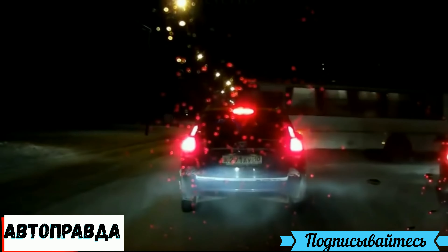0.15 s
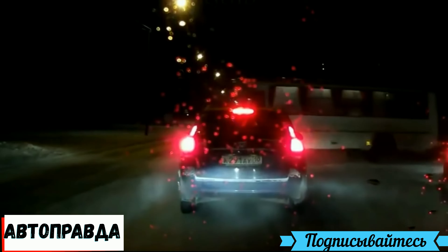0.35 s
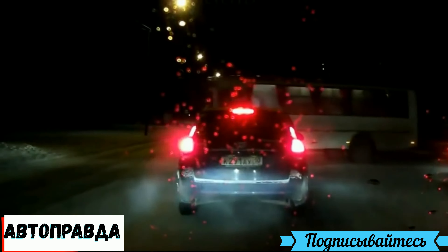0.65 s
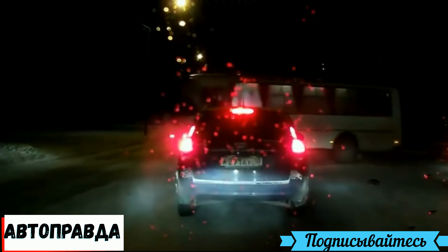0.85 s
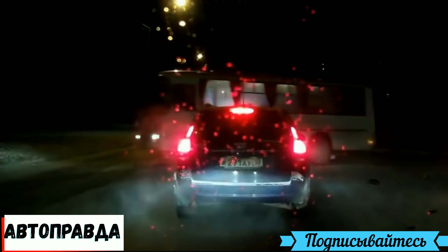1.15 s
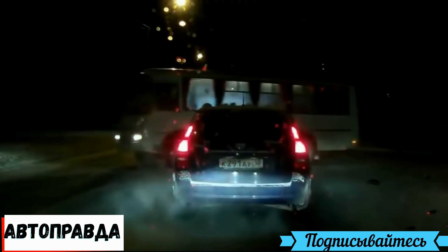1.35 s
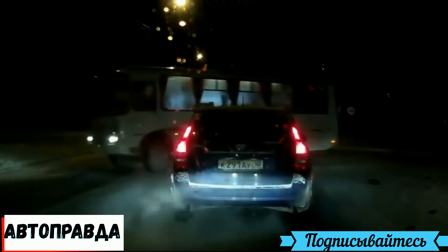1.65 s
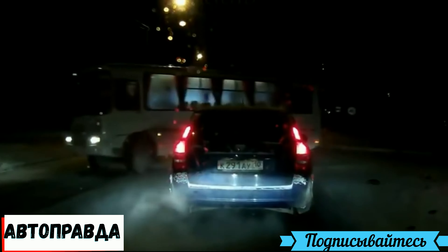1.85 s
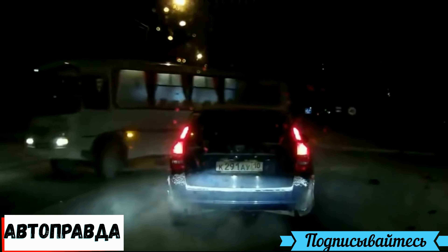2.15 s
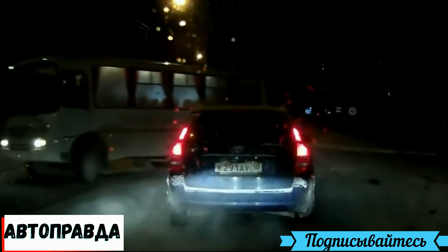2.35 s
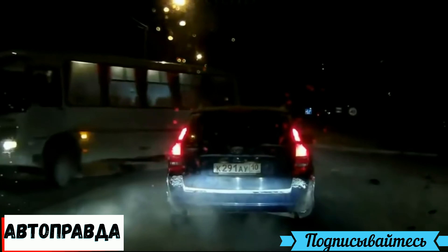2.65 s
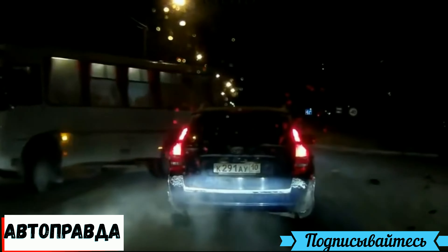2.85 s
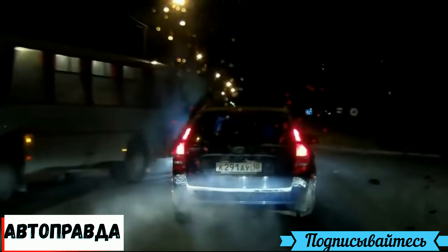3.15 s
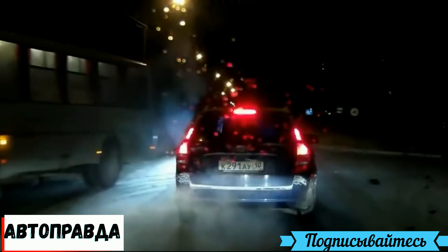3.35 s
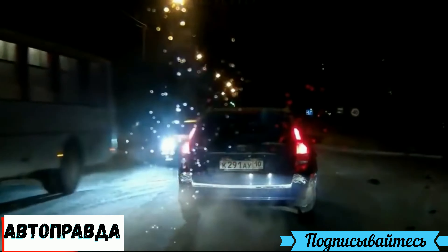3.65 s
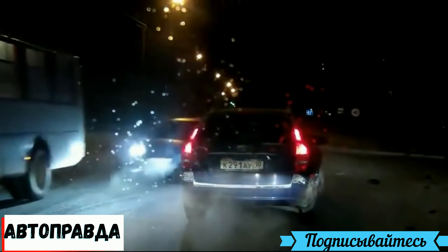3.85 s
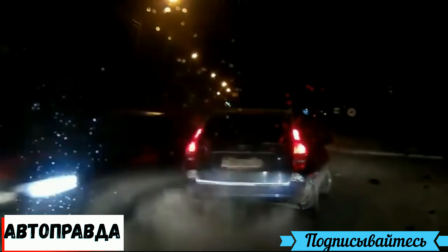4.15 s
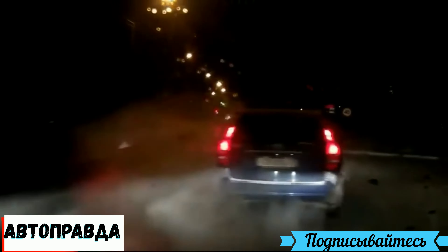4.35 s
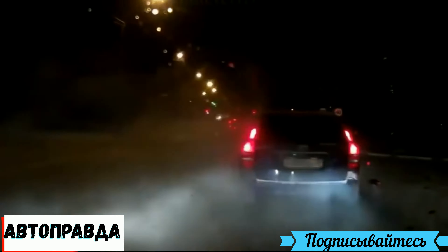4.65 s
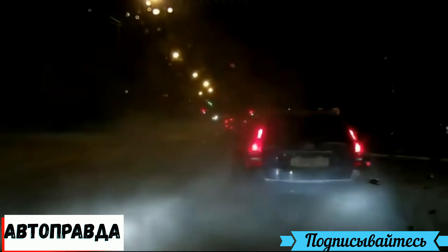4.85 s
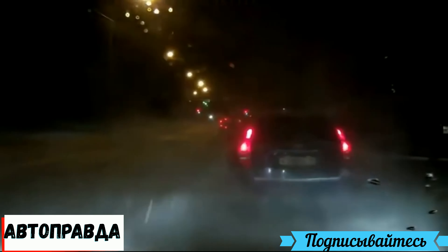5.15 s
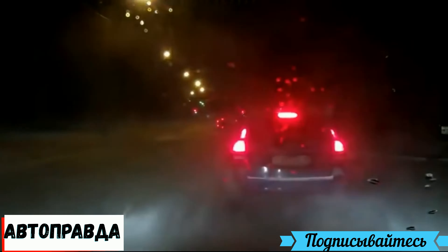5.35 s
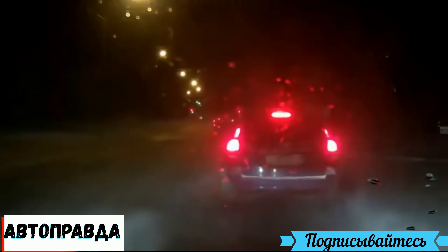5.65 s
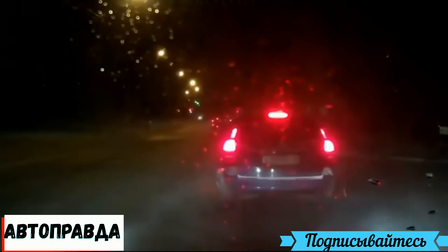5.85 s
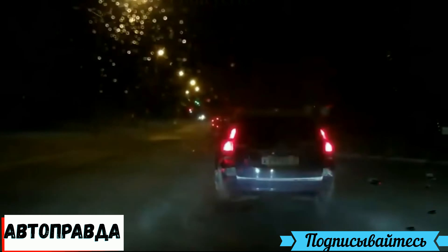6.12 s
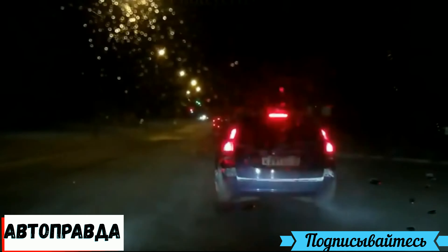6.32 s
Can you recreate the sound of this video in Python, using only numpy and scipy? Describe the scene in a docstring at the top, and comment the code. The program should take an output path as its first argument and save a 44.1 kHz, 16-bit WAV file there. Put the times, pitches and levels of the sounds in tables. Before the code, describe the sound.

A small, narrow-sounding dashboard microphone with faint electronic hiss sits in a closed car cabin on a snowy road. From 0 s, tyres rumble low and steadily over a quiet idling engine. From about 1.7 s a bus drones low, dipping in pitch near 2.6 s, then pulling harder and rising until about 3.6 s before dropping again. Slush sprays around 3.3 s, more strongly at 3.6 s with a hollow wheel-arch drumming, and again near 4 s. At 4.27 s a first crunching blow lands; from 4.5 to 4.7 s a heavier one booms through the body, distorting, with plastic and metal crackle and short rasping squeaks. It shudders away by about 5 s. The engine flares around 4.9 s, then sinks while growing louder. Debris clinks sparsely, densest from 5.35 to 5.6 s, with a few last ticks near 6-6.5 s over wet tyre hiss and low jolts.

```python
"""Car collision on a snowy road

A small microphone on the dashboard of a rolling car, on a snowy road at night: tyres rumble (shaped noise), the
engine turns slowly (two harmonics), a bus revs past across the lane, slush sprays (grains and mist).
A collision comes in two crunching blows (grains and noise through resonances), the second booming through the
body and overloading the microphone. Bits of plastic and glass then clink down while the car rolls on."""
import sys
import numpy as np
from scipy import signal
from scipy.fft import rfft, irfft, next_fast_len
from scipy.io import wavfile
from scipy.ndimage import uniform_filter1d

SR = 44100
rng = np.random.default_rng(int(sys.argv[2]) if len(sys.argv) > 2 else 0)


def unload_wav(signal):
    """Save mono or channel-first audio to the path in sys.argv[1] as 16-bit WAV at rate SR, clipped to [-1, 1]."""
    wavfile.write(
        sys.argv[1],
        SR,
        np.round(np.clip(np.atleast_2d(signal).T, -1, 1) * 32767).astype(np.int16),
    )


N = 286089
T = np.arange(N) / SR  # t/s


# Blows: height t/s, rise/s, fall/s, body shake level/dB, crunch level/dB, boom f/Hz, boom peak level/dB
BLOWS = [(4.266, 0.031, 0.067, -16, -24.5, 113.8, -10), (4.295, 0.022, 0.029, -11.5, -27.5, 425, -14.5),
         (4.364, 0.045, .022, -32, -58, 133.5, -14.5), (4.514, 0.01, 0.012, -18.5, -38, 140, -8),
         (4.564, 0.027, 0.074, -11, -31, 130.6, -11), (4.6, 0.016, 0.028, -9, -45, 244, -7),
         (4.659, .033, 0.035, -5.5, -26.5, 117, -9), (4.737, 0.018, 0.016, -29, -44, 133, -10.5)]
# Colour of the shaking body: f/Hz, level per Hz/dB
SHAKE_COLOUR = [(20, -7), (55, 1), (82, -7), (125, 2), (175, -6), (250, -8), (340, -7.5), (420, -11.5),
                (560, -13), (700, -18), (1000, -26), (1600, -34.5), (3000, -33.5)]
# Resonances of the shaken body: f/Hz, width/Hz, level/dB
BODY_MODES = [(176.3, 10.8, 6.5), (202, 15.5, 2), (251.7, 14.6, 5.5), (332.5, 21, -0.5), (408, 13, -6.5),
              (482, 20, -9), (690, 8.4, -6.5), (889, 16, -9), (1394, 22, -19.5)]
# Colour of crunching plastic and sheet metal: f/Hz, level per Hz/dB
CRUNCH_COLOUR = [(600, -8), (1200, -1.5), (1800, -4), (2200, 3), (2600, 0.5), (3000, -1.5), (3500, -6),
                 (4200, -5), (4900, -22), (7000, -35)]
# Resonances of the crumpling panels: f/Hz, width/Hz, level/dB
PANEL_MODES = [(1914, 24, 0), (2170, 46, -5.5), (2496, 100, -1), (2870, 50, 0), (2950, 40, 1),
               (3230, 44, 4.5), (3590, 70, 0.5), (3900, 160, -14)]
# What lingers after each blow, in dB below it
SHUDDER_DB, SHUDDER_DECAY_S = -12, 0.14
GRIND_DB, GRIND_DECAY_S = -14, 0.21


def collision():
    """Each blow buckles a panel: it booms, shakes the body and crunches, then shudders and grinds away."""
    shaking, crunching, booms = [], [], 0
    for at, rise, fall, shake_db, crunch_db, boom_hz, boom_db in BLOWS:
        force = swell(at, rise, fall)
        shudder = undb(SHUDDER_DB) * aftermath(at, SHUDDER_DECAY_S)
        grind = undb(GRIND_DB) * aftermath(at, GRIND_DECAY_S)
        shaking.append(undb(shake_db) * np.maximum(force, shudder))
        crunching.append(undb(crunch_db) * np.maximum(force, grind))
        booms = booms + undb(boom_db) * force * np.cos(2 * np.pi * boom_hz * (T - at))

    rattle = colour(grains(rate=2500, spread_db=2.0), SHAKE_COLOUR)
    body = unit(resonate(grains(rate=3100, spread_db=1.0), BODY_MODES))
    shake = unit(rattle + undb(-4) * body)

    crackle = colour(grains(rate=3300, spread_db=6), CRUNCH_COLOUR)
    panels = unit(resonate(colour(noise(), CRUNCH_COLOUR), PANEL_MODES))
    crunch = unit(crackle + undb(2) * panels) * undb(1.7 * walk(90))
    return shake * together(shaking) + crunch * together(crunching) + booms


# Heaves at the big blows, jolts as the car rolls on: height t/s, f/Hz, peak level/dB
JOLTS = [(4.331, 55, -17), (4.655, 55.4, 1), (4.931, 50.5, -21.5), (5.05, 48, -19), (5.26, 46.9, -19),
         (5.718, 42.4, -22)]
JOLT_RISE_S, JOLT_FALL_S = 0.027, 0.047
# Deep rumble of the whole shell around the collision
WALLOW_HZ, WALLOW_WIDTH_HZ, WALLOW_DB = 36.7, 11, -23.5
WALLOW_S, WALLOW_RISE_S, WALLOW_FALL_S = 4.39, 0.47, .9


def jolts():
    """The whole shell swings on its springs in short low tones and rumbles in a narrow band."""
    swings = 0
    for at, hz, db in JOLTS:
        envelope = undb(db) * swell(at, JOLT_RISE_S, JOLT_FALL_S)
        swings = swings + envelope * np.cos(2 * np.pi * hz * (T - at))
    wallow = undb(WALLOW_DB) * band(WALLOW_HZ, WALLOW_WIDTH_HZ)
    return swings + wallow * swell(WALLOW_S, WALLOW_RISE_S, WALLOW_FALL_S)


# Squeaks of sliding panels: height t/s, level/dB before the rasp
SQUEAKS = [(4.43, -31), (4.52, -24), (4.548, -24.5), (4.62, -24.5), (4.678, -26.5), (4.745, -32)]
SQUEAK_RISE_S, SQUEAK_FALL_S = 0.0109, .014
SQUEAK_HZ, SQUEAK_BEND_HZ = 2490, 129.8  # pitch when barely pressed, and its rise at the greatest pressure


def squeaks():
    """A sliding panel squeals higher the harder it is pressed; stick and slip make it rasp and break up."""
    pressure = sum(undb(db) * swell(at, SQUEAK_RISE_S, SQUEAK_FALL_S) for at, db in SQUEAKS)
    rasp = 1 + .03 * walk(1200) + .024 * walk(140)
    hz = (SQUEAK_HZ + SQUEAK_BEND_HZ * pressure / pressure.max()) * rasp
    breaking_up = undb(2.5 * walk(300))
    return pressure * breaking_up * np.sin(2 * np.pi * np.cumsum(hz) / SR)


# Falling bits: t/s, clink level/dB, ring f/Hz, chatter decay/s, dull knock level re clink/dB
CLINKS = [(4.971, -49.5, 3060, 0.023, 13), (5.156, -25, 4400, 0.0038, -37), (5.305, -47, 5160, 0.012, -25),
          (5.3492, -14.5, 2880, 0.0032, -5.5), (5.352, -17, 2090, 0.0038, -9.5),
          (5.357, -21, 3770, 0.0025, -0.5), (5.464, -33.5, 3420, 0.0038, -10),
          (5.479, -15.5, 3560, 0.003, -20), (5.485, -31, 2690, 0.0042, -13),
          (5.4997, -34, 4000, .0031, -18), (5.549, -21.5, 3330, 0.0032, -17),
          (5.567, -25, 3100, 0.0044, -19), (5.574, -28, 2420, 0.0092, -12), (5.614, -38, 3800, 0.014, -11),
          (5.680, -41.5, 2840, 0.031, -10), (5.985, -37.5, 3375, .0044, -17),
          (6.0218, -27, 5040, 0.012, -6.5), (6.082, -32.5, 4100, 0.0059, -21),
          (6.093, -27, 2750, 0.0055, -11), (6.203, -48, 1070, 0.033, 8.5), (6.480, -31.5, 3840, .008, -8)]
# Resonances all the bits share: f/Hz, width/Hz, level/dB
SHARD_MODES = [(1470, 160, -8), (1830, 100, -2), (2285, 140, 2), (2720, 180, 1), (3040, 140, 0.5),
               (3600, 340, 0.5), (4160, 176, 3), (4870, 910, -5), (6200, 1200, -20)]
TOUCH_DB = 13.5  # first sharp touch, above the chatter


def debris():
    """Each bit strikes, chatters for a few milliseconds or more and rings."""
    t = T[:SR // 5]
    out = np.zeros(N + len(t))
    for at, db, hz, decay, knock_db in CLINKS:
        chatter, thud, tail = rng.standard_normal((3, len(t)))
        contact = chatter * np.exp(-t / decay) + undb(-19) * tail * np.exp(-t / 0.018)
        contact[0] += undb(TOUCH_DB)
        # all bits ring alike, and each adds a short note of its own
        shards = resonate(contact, SHARD_MODES) + undb(-15.0) * contact
        clink = unit(ring(shards, hz, 0.59 * hz))
        note = unit(np.sin(2 * np.pi * hz * t) * np.exp(-t / (0.68 * decay)))
        knock = unit(ring(ring(thud * np.exp(-t / decay), 840, 1300), 860, 1170))
        bit = clink + undb(-6.5) * note + undb(knock_db) * knock
        # the level counts over the decay, not over the whole window
        gain = undb(db) * np.sqrt(decay / t[-1])
        start = int(at * SR)
        out[start:start + len(t)] += gain * bit
    return out[:N]


CRUMB_DB, CRUMB_DECAY_S = -32, 0.035  # re the level of the bit that sheds them
SHOWER_S, SHOWER_DB, SHOWER_RISE_S, SHOWER_FALL_S = 5.61, -47.5, 0.29, .9


def crumbs():
    """Crumbs skitter as tiny ringing impacts after each falling bit and in a thin shower between them."""
    shed = [undb(db + CRUMB_DB) * aftermath(at, CRUMB_DECAY_S) for at, db, *_ in CLINKS]
    shower = undb(SHOWER_DB) * swell(SHOWER_S, SHOWER_RISE_S, SHOWER_FALL_S)
    skitter = unit(resonate(grains(rate=600, spread_db=-0.5), SHARD_MODES))
    return skitter * together(shed + [shower])


# Slush thrown by tyres, and at 4.48 s snow thrown up by the collision: t/s, hold/s, drops level/dB, rise/s,
# fall/s, fine mist level/dB, arch drumming level/dB
SPLASHES = [(3.335, 0.038, -47.5, 0.085, .05, -56.5, -71), (3.595, .11, -36, 0.036, .012, -46, -29),
            (3.915, 0.022, -38.5, 0.045, .036, -53, -58), (4.015, 0.039, -35, 0.044, 0.058, -49.5, -48),
            (4.48, 0.28, -39.5, 0.14, 0.12, -60.5, -66), (4.975, .03, -45, 0.038, 0.03, -68, -60)]
# Colour of the spray: f/Hz, level per Hz/dB
SPRAY_COLOUR = [(300, -23), (700, 2), (1000, 0), (1400, 0.5), (1900, -5.5), (2800, -0.5), (4400, -1.5),
                (5500, -11), (6800, -18.5), (7800, -9)]
MIST_HZ, MIST_WIDTH_HZ = 6100, 2000
# Tyre hiss on the wet road
WET_DB, WET_S, WET_RISE_S, WET_HOLD_S, WET_FALL_S = -53.5, 3.83, 0.78, 2.15, 0.83


def spray():
    """Wet snow sprays in bursts of drops (grains) and mist (high noise) over the hiss of the tyres."""
    drop_levels = [undb(WET_DB) * swell(WET_S, WET_RISE_S, WET_FALL_S, WET_HOLD_S)]
    mist_level = 0
    for at, hold, db, rise, fall, mist_db, _ in SPLASHES:
        burst = swell(at, rise, fall, hold)
        drop_levels.append(undb(db) * burst)
        mist_level = mist_level + undb(mist_db) * burst
    drops = colour(grains(rate=6000, spread_db=0), SPRAY_COLOUR) * together(drop_levels)
    mist = band(MIST_HZ, MIST_WIDTH_HZ) * mist_level
    return (drops + mist) * undb(1.2 * walk(110))


# Resonances of the wheel arch: f/Hz, width/Hz, level/dB
ARCH_MODES = [(174.6, 37, 3), (192, 7.9, -10), (594, 62, -5.5), (825, 110, -7.5), (1410, 28, -11),
              (3200, 71, -17)]
ARCH_HZ, ARCH_NOTE_DB, ARCH_RING_S = 178.6, 2, .045  # lowest note: pitch, peak re drumming, fall after a splash


def wheel_arch():
    """The thickest slush drums in a wheel arch and sets its lowest note humming; the note rings on."""
    drumming = unit(sum(undb(db) * band(hz, width) for hz, width, db in ARCH_MODES))
    hz = ARCH_HZ * (1 + 0.021 * walk(25))
    note = undb(ARCH_NOTE_DB) * np.sin(2 * np.pi * np.cumsum(hz) / SR)
    out = 0
    for at, hold, _, rise, fall, _, db in SPLASHES:
        struck = drumming * swell(at, rise, fall, hold)
        humming = note * swell(at, rise, ARCH_RING_S, hold)
        out = out + undb(db) * (struck + humming)
    return out


# Bus engine: t/s, firing f/Hz
BUS_FIRING = [(1.7, 64.4), (2.64, 49.7), (3.0, 53.74), (3.58, 69.95), (4.0, 51.5), (4.2, 56), (4.5, 59)]
# Cabin air booming along with the bus, one row per harmonic: f/Hz, width/Hz, level/dB
AIR_MODES = [(56.5, 15, -2), (108.5, 46, -0.5)]
BUS_DB, BUS_PASSES_S, BUS_GAP_M, BUS_SPEED_M_S = -23.5, 4.44, 2.78, 4.6  # level at the closest point
# The second harmonic is weak while coasting; a swell adds to it as the bus pulls away after a gear change
COAST_DB, PULL_DB, PULL_S, PULL_RISE_S, PULL_FALL_S = -11, 0.5, 3.016, 0.25, 0.41


def bus():
    """The bus drones through its gears in two harmonics, louder as it nears and harder while it pulls."""
    hz, = curves(BUS_FIRING)
    pull = undb(COAST_DB) + undb(PULL_DB) * swell(PULL_S, PULL_RISE_S, PULL_FALL_S)
    distance_m = np.hypot(BUS_GAP_M, BUS_SPEED_M_S * (T - BUS_PASSES_S))
    nearness = BUS_GAP_M / distance_m
    phase = 2 * np.pi * np.cumsum(hz * (1 + 0.0121 * walk(23))) / SR
    first, second = (undb(db) * ring(np.sin(k * phase), centre, width)
                     for k, (centre, width, db) in enumerate(AIR_MODES, 1))
    level = np.sqrt(2) * undb(BUS_DB + .8 * walk(14)) * nearness
    return level * (first + pull * second) * during(BUS_FIRING)


# Own engine: it idles, flares once just after the collision and sinks back, growing louder as it labours
IDLE_HZ, IDLE_DB = 26.53, -36.5
FLARE_S, FLARE_HZ, FLARE_RISE_S, FLARE_FALL_S = 4.9, 23.46, .42, .85  # Hz above idle
LABOUR_S, LABOUR_DB, LABOUR_RISE_S, LABOUR_FALL_S = 5.84, 10, .55, .8  # dB above idle


def own_engine():
    """Only the two lowest harmonics of the car's unsteady engine pass into the cabin."""
    hz = IDLE_HZ + FLARE_HZ * swell(FLARE_S, FLARE_RISE_S, FLARE_FALL_S)
    level_db = IDLE_DB + LABOUR_DB * swell(LABOUR_S, LABOUR_RISE_S, LABOUR_FALL_S)
    phase = 2 * np.pi * np.cumsum(hz * (1 + 0.0506 * walk(15))) / SR
    harmonics = np.sin(phase) + undb(-9.5) * np.sin(2 * phase)
    return np.sqrt(2) * undb(level_db + 2.3 * walk(19)) * harmonics


# Colour of the road noise in the cabin: f/Hz, level per Hz/dB
ROAD_COLOUR = [(11, -29), (18, -14.5), (37, 0), (109, -7), (154, -15.5), (188, -14), (302, -14), (439, -18),
               (688, -22), (760, -27), (1130, -33), (1610, -32.5), (2170, -39), (2780, -36.5), (7000, -59),
               (9100, -88), (15400, -120)]
# Course of the road noise: t/s, level/dB
ROAD_LEVEL = [(0, -33.5), (2.5, -32.5), (4.0, -31.5), (5.0, -30), (5.6, -32), (6.49, -32)]
# Narrow resonances of cabin trim and vents: f/Hz, width/Hz, level/dB
TRIM_MODES = [(435.7, 67, -44), (685, 54, -50.5), (1353, 100, -65.5), (1629, 40, -60), (2500, 240, -63.5),
              (3480, 180, -66), (5210, 41, -74)]


def road():
    """Tyres on uneven packed snow rumble through the cabin, over steady noise bands of its trim."""
    level_db, = curves(ROAD_LEVEL)
    rumble = colour(noise(), ROAD_COLOUR) * undb(level_db + .4 * walk(7.5))
    trim = sum(undb(db) * band(hz, width) for hz, width, db in TRIM_MODES)
    return rumble + trim


def cabin(x):
    """Close glass and trim return the mids and treble for a few hundredths of a second."""
    t = T[:SR // 10]
    echoes = rng.standard_normal(len(t)) * np.exp(-t / .014) * (t > .002)
    echoes = ring(echoes, 2600, 8000)
    echoes *= undb(-17) / np.linalg.norm(echoes)
    return x + signal.fftconvolve(x, echoes)[:N]


def undb(db):
    """Decibels to gain."""
    return 10 ** (np.asarray(db) / 20)


def unit(x):
    """Scale to a standard deviation of 1."""
    return x / (np.std(x) + 1e-12)


def curves(table):
    """The columns of a table, joined by straight lines in time."""
    s, *columns = np.transpose(table)
    return [np.interp(T, s, c) for c in columns]


def during(table):
    """A gate over the time that a table covers, with 30 ms ramps inside its ends."""
    opening = np.clip((T - table[0][0]) / .03, 0, 1)
    closing = np.clip((table[-1][0] - T) / .03, 0, 1)
    return opening * closing


def noise():
    """White noise."""
    return rng.standard_normal(N)


def walk(rate):
    """Smooth random drift with spread 1, from rate random values a second."""
    k = max(int(SR / rate), 1)
    steps = np.repeat(rng.standard_normal(N // k + 1), k)
    return unit(uniform_filter1d(steps, k)[:N])


def grains(rate, spread_db):
    """Tiny impacts of uneven size, rate a second."""
    hits = rng.random(N) < rate / SR
    sizes = noise() * undb(spread_db * np.clip(noise(), -2, 2))
    return unit(hits * sizes)


def colour(x, points):
    """Give x a spectrum of (f/Hz, level/dB) points that falls 24 dB an octave beyond its ends; unit spread."""
    hz, db = np.transpose(points)
    size = next_fast_len(N)
    octave = np.log2(np.fft.rfftfreq(size, 1 / SR) + 1)
    outside = np.abs(octave - np.clip(octave, np.log2(hz[0]), np.log2(hz[-1])))
    gain = undb(np.interp(octave, np.log2(hz), db) - 24 * outside)
    return unit(irfft(rfft(x, size) * gain, size)[:N])


def ring(x, hz, width):
    """One resonance, gain 1 at its centre."""
    return signal.lfilter(*signal.iirpeak(hz, hz / width, fs=SR), x)


def resonate(x, modes):
    """x through a set of (f/Hz, width/Hz, level/dB) resonances of alternating sign."""
    return sum((-1) ** k * undb(db) * ring(x, hz, width) for k, (hz, width, db) in enumerate(modes))


def band(hz, width):
    """Noise through two equal resonances for steeper skirts, each wider than the nominal width; unit spread."""
    return unit(ring(ring(noise(), hz, 1.77 * width), hz, 1.77 * width))


def swell(at, rise, fall, hold=0):
    """A rounded rise to 1, a hold and a fall."""
    away = np.maximum((at - T) / rise, 0) + np.maximum((T - at - hold) / fall, 0)
    return np.exp(-np.minimum(away, 20) ** 1.576)


def aftermath(at, decay):
    """1 at a blow, then dying away."""
    return (T >= at) * np.exp(-np.minimum(np.abs(T - at) / decay, 20))


def together(envelopes):
    """The envelope of unrelated noises that overlap: their powers add."""
    return np.sqrt(sum(e ** 2 for e in envelopes))


def scene():
    """Everything heard at the windscreen; engine and bus stay free of cabin echoes."""
    crash = collision() + jolts() + squeaks() + debris() + crumbs()
    echoing = cabin(road() + spray() + wheel_arch() + crash)
    return (echoing + own_engine() + bus())[None]


# Colour of the electronic hiss: f/Hz, level per Hz/dB
HISS_COLOUR = [(1000, -1.5), (7000, -1.5), (9000, 0.3), (14000, -4)]
HISS_DB = -60
MIRROR_HZ, NOTCH_WIDTH_HZ, TOP_HZ = 16000, 1400, 14200


def record(dry):
    """The microphone overloads, keeps a narrow band with a faint mirror image above, and hisses with loudness."""
    clipped = dry / (1 + np.abs(dry / .97) ** 8) ** (1 / 8)
    narrow = signal.sosfilt(signal.butter(10, 7400, fs=SR, output="sos"), clipped)
    treble = signal.sosfilt(signal.butter(5, 6000, "high", fs=SR, output="sos"), narrow)
    # the product flips the treble about half of MIRROR_HZ
    mirror = undb(-8.5) * treble * np.cos(2 * np.pi * MIRROR_HZ * T)
    steady_hiss = undb(HISS_DB) * colour(noise(), HISS_COLOUR)
    loud_hiss = undb(-45.5) * narrow * noise()
    out = narrow + mirror + steady_hiss + loud_hiss
    # a dip where the band and its mirror image meet
    out = out - .85 * ring(out, MIRROR_HZ / 2, NOTCH_WIDTH_HZ)
    return signal.sosfilt(signal.ellip(12, .2, 95, TOP_HZ, fs=SR, output="sos"), out)


dry = scene()
out = record(dry)
unload_wav(out)
```